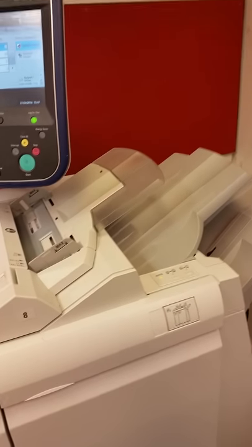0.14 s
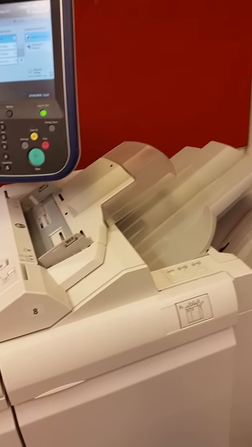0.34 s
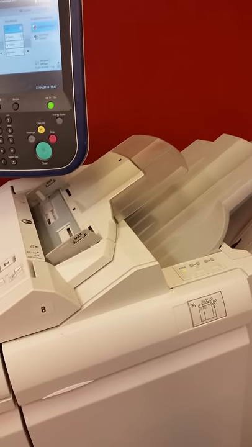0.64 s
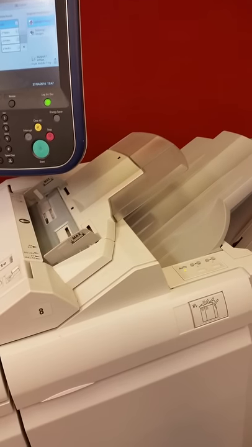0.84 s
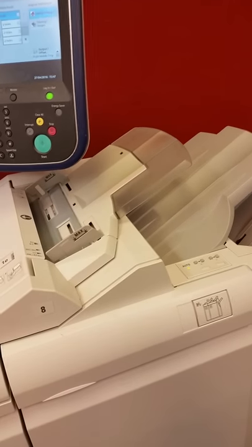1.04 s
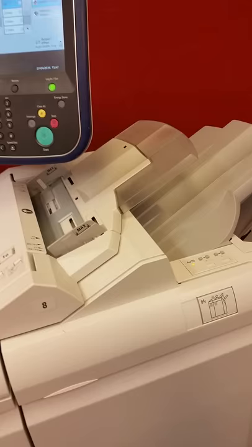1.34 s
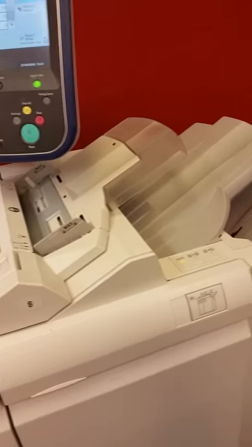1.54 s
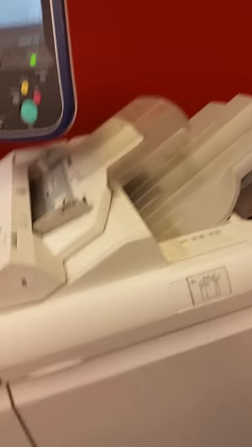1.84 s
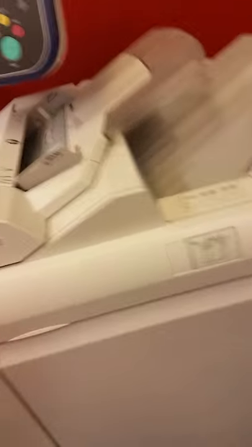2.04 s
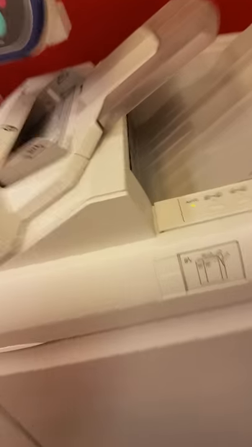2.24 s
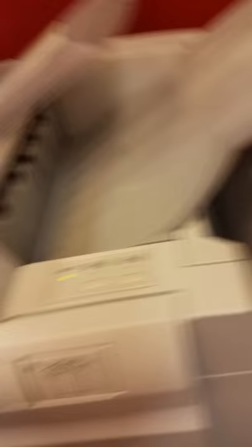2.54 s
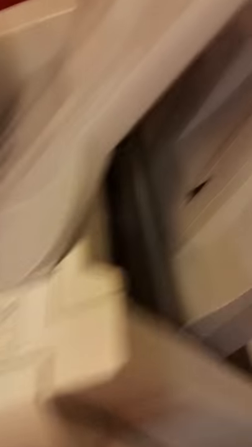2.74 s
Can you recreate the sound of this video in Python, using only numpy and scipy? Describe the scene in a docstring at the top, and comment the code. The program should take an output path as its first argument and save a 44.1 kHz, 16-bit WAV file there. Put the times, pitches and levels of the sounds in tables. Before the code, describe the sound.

Close handheld stereo pickup of a large copier: three evenly spaced bursts of hard clatter with a hollow cabinet boom, over steady hum, faint whine and fan air, then grip thumps and hissy rubbing.

```python
"""Small room with a large office copier: motor hum, a thin whine, rumble and fan air run throughout.
Every 1.24 s a volley of chattering strikes rings its casing and metal parts and booms its cabinet.
Hum and whine are wavering sines; rumble and fans are shaped noise; rings are noise bursts driven by the strikes.
Late on, the hand holding the phone shifts its grip: palm hiss, knocks and rubs beside the two microphone
ports, made of filtered noise and pressure pushes."""
import sys
import numpy as np
from scipy import signal
from scipy.fft import rfft, irfft
from scipy.io import wavfile
from scipy.ndimage import uniform_filter1d

SR = 44100
rng = np.random.default_rng(int(sys.argv[2]) if len(sys.argv) > 2 else 0)


def persist_wave(psi):
    """Save psi, clipped to +-1, as 16-bit WAV."""
    counts = np.round(np.clip(psi, -1, 1) * 32767).astype(np.int16)
    wavfile.write(sys.argv[1], SR, np.atleast_2d(counts).T)


N = 127890


def undb(db):
    """Amplitude ratio of a level in dB."""
    return 10 ** (np.asarray(db) / 20)


def unit(x):
    """Scale to an rms of 1."""
    return x / np.sqrt(np.mean(x ** 2))


def at(points, hz):
    """Read (frequency [Hz], value) points on a log-frequency axis."""
    p = np.array(points)
    return np.interp(np.log(np.maximum(hz, 1)), np.log(p[:, 0]), p[:, 1])


def colour(x, points):
    """Causal minimum-phase filter, built by folding the cepstrum of (frequency [Hz], gain [dB])."""
    size = 8192
    gain = undb(at(points, np.fft.rfftfreq(size, 1 / SR)))
    cepstrum = irfft(np.log(gain))
    cepstrum[1:size // 2] *= 2
    cepstrum[size // 2 + 1:] = 0
    response = irfft(np.exp(rfft(cepstrum)))
    return signal.fftconvolve(np.atleast_2d(x), response[None], axes=-1)[:, :x.shape[-1]]


# likeness of the two channels: (frequency [Hz], likeness [0-1])
CHANNEL_LIKENESS = [(60, 0.86), (130, 1), (290, 0.85), (640, 0.52), (1410, 0.07), (3100, 0), (15000, 0)]


def diffuse(points, size=N):
    """Stereo room noise of unit rms and given spectrum: alike in the bass, unrelated in the treble."""
    hz = np.fft.rfftfreq(size, 1 / SR)
    like = np.clip(at(CHANNEL_LIKENESS, hz), 0, 1)
    noise = rfft(rng.standard_normal((2, size)))
    mid, side = noise * np.sqrt([1 + like, 1 - like]) * undb(at(points, hz))
    return unit(irfft(np.array([mid + side, mid - side]), size))


def walk(rate_hz, size=N):
    """Smooth random curve of unit rms: held random steps, averaged twice."""
    k = max(int(SR / rate_hz), 1)
    steps = rng.standard_normal(size // k + 1)[np.arange(size) // k]
    return unit(uniform_filter1d(uniform_filter1d(steps, k), k))


def pan(left_minus_right_db):
    """Channel gains, the level difference split evenly."""
    return undb(np.array([[left_minus_right_db], [-left_minus_right_db]]) / 2)


def fade(t, t60_s):
    """Exponential decay, 60 dB in t60_s."""
    return np.exp(-np.log(1000) * t / t60_s)


def add(out, start_s, x):
    """Mix x into out at start_s."""
    i = max(int(start_s * SR), 0)
    if i < N:
        out[..., i:i + x.shape[-1]] += x[..., :N - i]


# motor hum lines: (frequency [Hz], rms level [dB])
HUM_LINES = [(107.7, -36.5), (139, -49.5), (323, -56.5), (721.4, -61)]
HUM_WAVER_DB, HUM_DRIFT_RATIO = 1.9, .0012
WHINE_HZ, WHINE_DB = 1734.5, -60
# cabinet rumble spectrum: (frequency [Hz], relative density [dB per Hz])
RUMBLE_SPECTRUM = [(20, -32), (42, -16), (55, -19), (80, -9), (105, -10.5), (140, 0.5), (170, -5),
                   (215, -16.5), (320, -20), (500, -31.5), (1000, -52), (8000, -100)]
RUMBLE_DB, RUMBLE_FLUTTER_DB = -33.5, 1
# fan air spectrum: (frequency [Hz], relative density [dB per Hz])
FAN_SPECTRUM = [(100, -7.5), (750, 0), (1200, -6), (2000, -6), (3200, -13), (4500, -13), (6000, -27),
                (9500, -21.5), (12000, -32.5), (16000, -31)]
FANS_DB = -49.5


def motors():
    """Hum and whine share one drifting pitch and wavering level, over fluttering rumble and even fan air."""
    clock = 2 * np.pi * np.cumsum(1 + HUM_DRIFT_RATIO * walk(13.43)) / SR
    tones = [*HUM_LINES, (WHINE_HZ, WHINE_DB)]
    lines = sum(np.sqrt(2) * undb(db) * np.sin(hz * clock) for hz, db in tones)
    wavering = lines * undb(HUM_WAVER_DB * walk(10.22))
    rumble = diffuse(RUMBLE_SPECTRUM) * undb(RUMBLE_DB + RUMBLE_FLUTTER_DB * walk(20))
    return wavering + rumble + undb(FANS_DB) * diffuse(FAN_SPECTRUM)


# copier cycles: (start [s], level [dB])
COPIER_CYCLES = [(.045, 0), (1.287, 0.5), (2.528, 2)]
# strikes: (time after cycle start [s], casing level [dB], metal level [dB], chatter decay constant [s])
CYCLE_STRIKES = [(-.001, -16, -16, .008), (.006, -9, -10, .012), (.023, 0, -2, .009), (.083, -8, -5, .009),
                 (.123, 1, 3, .012), (.182, -5, -2, .014), (.275, -20, -17, .012), (.338, -25, -24, .008),
                 (.413, -26, -25, .008), (.49, -32, -34, .008)]
CONTACTS_PER_S, CONTACT_SCATTER_DB, STRIKE_SCATTER_DB = 2500, 2.5, 1.25


def contacts(t):
    """Each strike is a quickly dying chatter of tiny contacts; returns the forces on casing and metal."""
    force, age = np.zeros((2, N)), t[:SR // 10]
    for start, cycle_db in COPIER_CYCLES:
        for offset, casing_db, metal_db, chatter_s in CYCLE_STRIKES:
            touch = rng.random(len(age)) < CONTACTS_PER_S / SR
            signs = rng.choice([-1, 1], len(age))
            sizes = signs * undb(CONTACT_SCATTER_DB * rng.standard_normal(len(age)))
            clicks = touch * sizes * np.exp(-age / chatter_s)
            strike_db = cycle_db + STRIKE_SCATTER_DB * rng.standard_normal()
            gain = undb(strike_db) / np.linalg.norm(clicks)  # equal energy before levels
            add(force, start + offset, gain * undb([[casing_db], [metal_db]]) * clicks)
    return force


FIXED_RING_SHARE = .5  # of the ring's energy


def ring(force, spectrum, envelope):
    """Ringing along the envelope: part fixed resonances, part a noise wash following the strike energy."""
    envelope = unit(envelope)
    response = diffuse(spectrum, size=len(envelope)) * envelope
    resonances = signal.fftconvolve(force[None], response, axes=-1)[:, :N]
    energy = np.maximum(signal.fftconvolve(force ** 2, envelope ** 2)[:N], 0)
    wash = np.sqrt((1 - FIXED_RING_SHARE) * energy) * diffuse(spectrum)
    return np.sqrt(FIXED_RING_SHARE) * resonances + wash


# ring spectra of casing, metal parts and cabinet: (frequency [Hz], relative density [dB per Hz])
CASING_SPECTRUM = [(100, -3.5), (200, 1.5), (450, 3.5), (640, -0.5), (900, 1.5), (1400, 1), (1700, -3),
                   (2400, -0.5), (3300, -8), (4400, -9.5), (7000, -10), (16000, -21)]
METAL_SPECTRUM = [(1500, -26), (4000, -25), (6500, -9.5), (8300, -1.5), (9600, 3.5), (10800, -2.5),
                  (13000, -4.5), (16000, -9.5)]
BOOM_SPECTRUM = [(25, -34), (50, -25), (70, -4), (110, -1), (155, 3), (200, -5), (330, -9), (480, -16),
                 (800, -23.5), (8000, -94)]
CASING_DB, METAL_DB, BOOM_DB = -35, -37, -38
CASING_T60_S, METAL_T60_S, ROOM_T60_S, BOOM_T60_S = 0.31, 0.27, 0.43, 0.42
CASING_ROOM_DB, METAL_ROOM_DB = -7, -31.5  # room tail against direct ring
BOOM_RISE_S, BOOM_LAG_S = 0.076, 0.031


def banging(t):
    """Casing and metal ring at once and fade into the room; the cabinet's boom builds later."""
    on_casing, on_metal = contacts(t)
    room = fade(t, ROOM_T60_S)
    casing = ring(on_casing, CASING_SPECTRUM, fade(t, CASING_T60_S) + undb(CASING_ROOM_DB) * room)
    metal = ring(on_metal, METAL_SPECTRUM, fade(t, METAL_T60_S) + undb(METAL_ROOM_DB) * room)
    swell = (1 - np.exp(-np.maximum(t - BOOM_LAG_S, 0) / BOOM_RISE_S)) ** 2
    boom = ring(on_casing, BOOM_SPECTRUM, swell * fade(t, BOOM_T60_S))
    return undb(CASING_DB) * casing + undb(METAL_DB) * metal + undb(BOOM_DB) * boom


# palm hiss level, right channel: (time [s], level [dB])
SLIDE_LEVEL = [(1.858, -100), (1.864, -50), (1.905, -43.5), (1.922, -61), (2.085, -65), (2.094, -44),
               (2.14, -53.5), (2.18, -48.5), (2.25, -52), (2.32, -45.5), (2.49, -38.5), (2.52, -50.5),
               (2.56, -69)]
# palm hiss spectrum: (frequency [Hz], relative density [dB per Hz])
SLIDE_SPECTRUM = [(3000, -33), (7500, -15), (9500, 1.5), (12000, 1), (13700, 2.5), (16000, -3)]
SLIDE_LEFT_DB = -13  # against the right


def palm_slide(t):
    """The palm hisses along the case: treble noise on a drawn level curve."""
    hiss = diffuse(SLIDE_SPECTRUM) * undb(np.interp(t, *np.array(SLIDE_LEVEL).T))
    return hiss * undb([[SLIDE_LEFT_DB], [0]])


# passage through the port: (frequency [Hz], gain [dB])
PORT_RESPONSE = [(40, -26), (200, 7.5), (2500, -1), (4500, 2), (5600, -24), (9000, -9), (16000, -13)]


def through_port(x):
    """The port's passage colours noise made beside it."""
    return colour(x, PORT_RESPONSE)


# knocks of the hand on the phone: (start [s], thud peak before pan [dB], push rise [s],
# thud high-pass [Hz], click peak against thud [dB], left minus right [dB])
HAND_KNOCKS = [(1.8632, -29.5, 0.00011, 400, 1, 2), (1.8694, -12.5, 0.00043, 146, -12.5, -13),
               (1.8750, -22.5, 0.0016, 100, -28, -22), (1.912, -16.5, .0007, 135, -21, -20.5),
               (1.9129, -17, 0.0014, 73, -19, -16.5), (2.0932, -22.5, 0.0013, 97, -23, -24),
               (2.1434, -21.5, 0.0015, 194, -17, 11), (2.1687, -29, 0.00074, 161, -10, 17),
               (2.2733, -24, 0.0015, 126, -6.5, 12), (2.8014, -12, 0.0015, 170, -5.5, 10.5)]
CLICK_DECAY_S = 0.00081


def knocks(t):
    """A finger lands: a click and a short push of pressure, which leaks away as a dry thud."""
    out, age = np.zeros((2, N)), t[:SR // 10]
    for start, db, rise_s, leak_hz, click_db, pan_db in HAND_KNOCKS:
        push = -age / rise_s * np.exp(1 - age / rise_s)
        thud = signal.sosfilt(signal.butter(3, leak_hz, "high", fs=SR, output="sos"), push)
        click = through_port(rng.standard_normal(len(age)) * np.exp(-age / CLICK_DECAY_S))
        knock = thud / np.abs(thud).max() + undb(click_db) * click / np.abs(click).max()
        add(out, start, undb(db) * pan(pan_db) * knock)
    return out


# skin rubs: (start [s], length [s], level before press and pan [dB], left minus right [dB], low-pass [Hz])
SKIN_RUBS = [(1.876, .037, -31, -14, 700), (1.893, .019, -31, -14, 1700), (2.170, .058, -44, 6, 6000),
             (2.275, .05, -50, 4, 4000), (2.41, .06, -53, 2, 4000), (2.008, .025, -53, 0, 6000)]
RUB_EDGE_S, RUB_ROUGH_DB = .008, 0.5


def rubs(t):
    """Skin sticks and slips beside the ports: rough, dulled noise pressed on and lifted off."""
    out, age = np.zeros((2, N)), t[:SR // 10]
    for start, length, db, pan_db, dull_hz in SKIN_RUBS:
        slips = rng.standard_normal(len(age)) * undb(RUB_ROUGH_DB * walk(500, size=len(age)))
        soft = signal.sosfilt(signal.butter(2, min(dull_hz, SR / 3), fs=SR, output="sos"), slips)
        press = np.clip(np.minimum(age, length + RUB_EDGE_S - age) / RUB_EDGE_S, 0, 1)
        rub = press * unit(through_port(soft))
        add(out, start - RUB_EDGE_S / 2, undb(db) * pan(pan_db) * rub)
    return out


def scene():
    """Sum of the copier and the hand on the phone."""
    t = np.arange(N) / SR
    return motors() + banging(t[:SR]) + palm_slide(t) + knocks(t) + rubs(t)


# left port against right: (frequency [Hz], level difference [dB])
PORT_DIFFERENCE = [(110, -0.5), (250, -1.5), (700, 0), (1300, -1.5), (2400, -2), (3300, 0.5), (4400, 9.5),
                   (5600, 9), (8100, -0.5), (15000, -6)]
TOP_HZ = 15800


def record(dry):
    """Each port colours the sound in its own way; the top is cut."""
    tilt_db = at(PORT_DIFFERENCE, np.fft.rfftfreq(2 * N, 1 / SR))
    port_gains = undb(np.array([tilt_db, -tilt_db]) / 2)
    heard = irfft(rfft(dry, 2 * N) * port_gains)[:, :N]
    return signal.sosfilt(signal.ellip(10, .2, 80, TOP_HZ, fs=SR, output="sos"), heard)


dry = scene()
out = record(dry)
persist_wave(out)
```